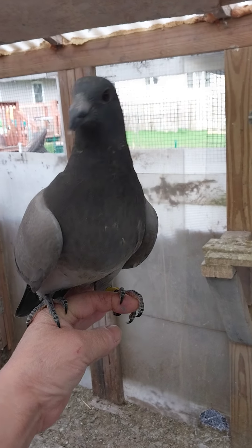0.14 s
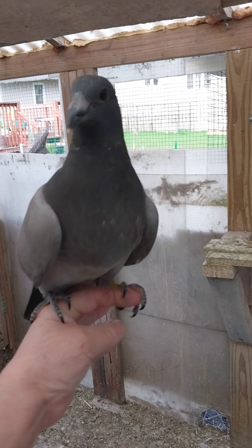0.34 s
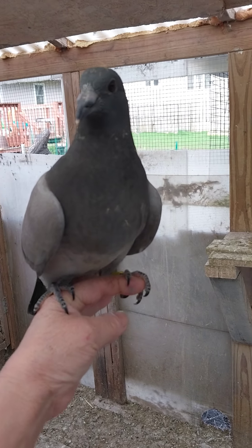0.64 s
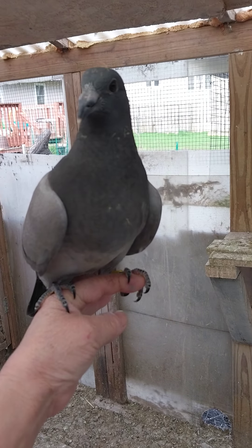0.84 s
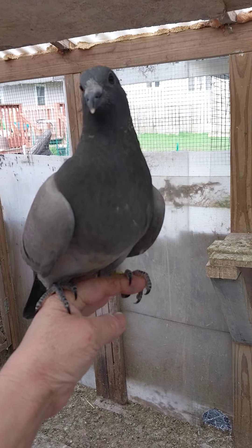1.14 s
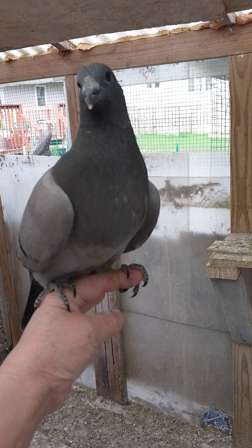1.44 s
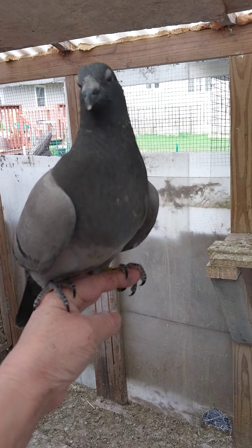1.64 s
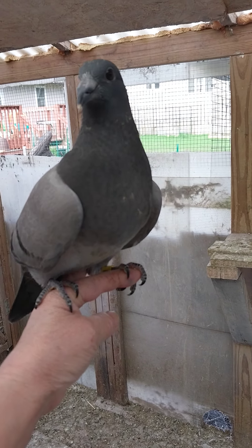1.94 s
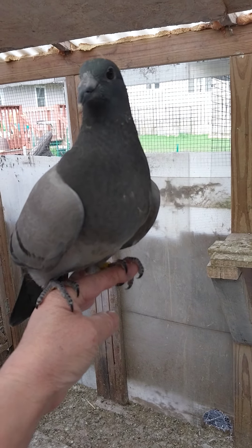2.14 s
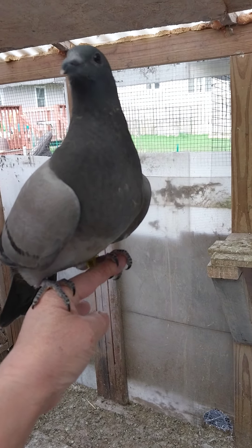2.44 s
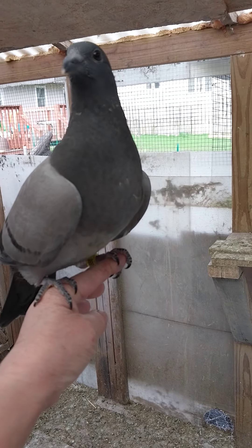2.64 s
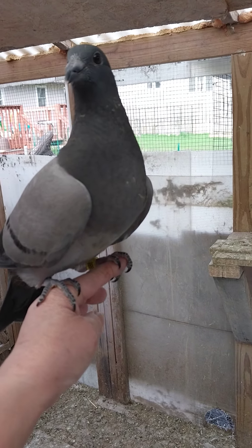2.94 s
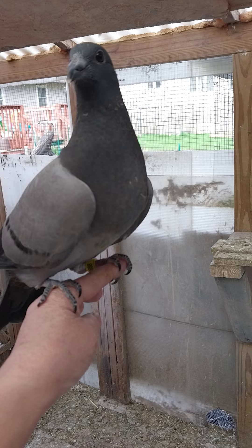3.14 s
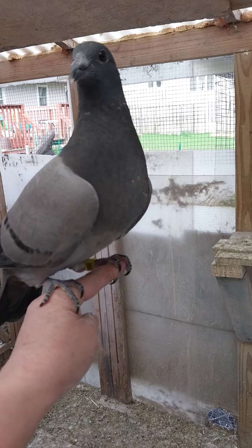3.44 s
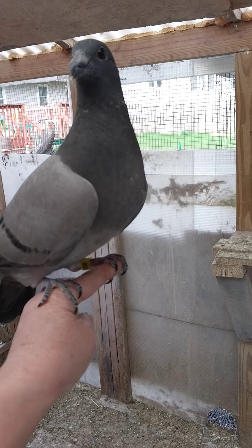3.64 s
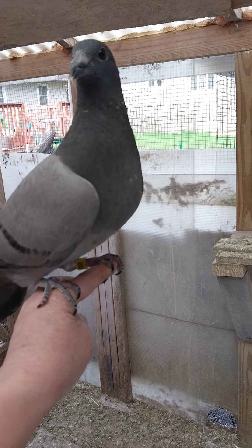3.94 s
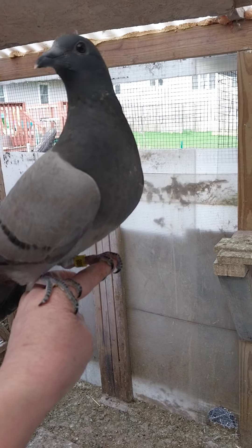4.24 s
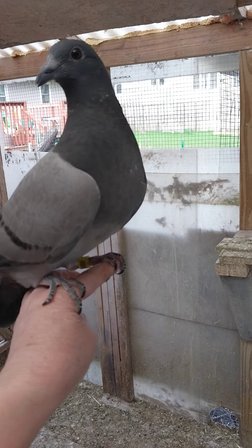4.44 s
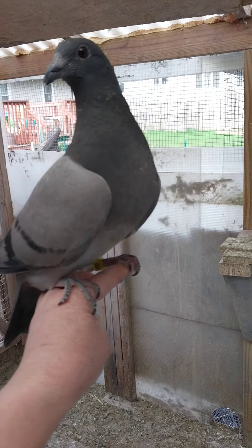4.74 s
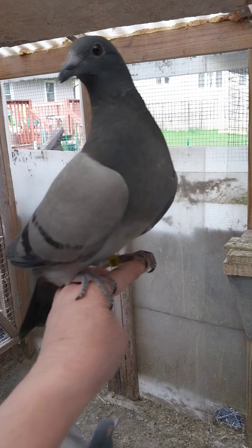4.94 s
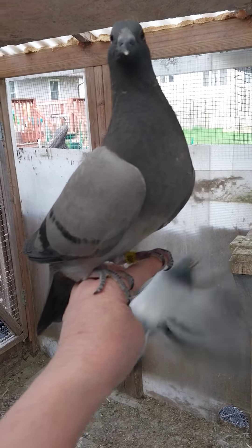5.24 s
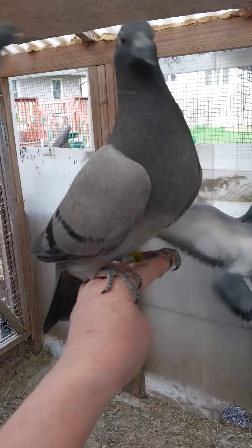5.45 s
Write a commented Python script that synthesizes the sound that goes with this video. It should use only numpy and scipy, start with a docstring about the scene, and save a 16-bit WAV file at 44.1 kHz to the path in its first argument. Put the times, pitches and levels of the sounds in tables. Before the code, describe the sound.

Throaty rolling pigeon coos with claw scratches and wooden knocks in a small loft, ending in a loud fluttering rush of wings.

```python
"""Pigeons in a small wooden loft

A pigeon perched on a hand gives three rolling coos and, later, one smooth falling one, with short hoots between.
The coos, hoots and thin whines are built from sine waves; feathers and claws are shaped noise.
Other birds knock on boards and a perch, which ring as sets of fading tones.
At the end a second pigeon flies up past the microphone: noise for its wings, low puffs for the moving air."""
import sys
import numpy as np
from scipy import signal
from scipy.fft import rfft, irfft, next_fast_len
from scipy.io import wavfile

SR = 44100
rng = np.random.default_rng(int(sys.argv[2]) if len(sys.argv) > 2 else 0)


def int16_out(signal):
    """Quantize to a 16-bit WAV file."""
    q = np.round(np.clip(np.atleast_2d(signal).T, -1, 1) * 32767)
    wavfile.write(sys.argv[1], SR, q.astype(np.int16))


N = 246298
T = np.arange(N) / SR  # time in seconds

# The swollen crop and closed beak let mostly low sound out.
# Each row: frequency in Hz, relative level in dB.
THROAT = [(60, -45), (150, -6), (300, 2.5), (420, 0.5), (495, -1), (590, -6), (690, -18.5), (900, -23.5),
          (1500, -47), (4000, -98.5)]
# Tone of claw scratches and wing slaps. Each row: frequency in Hz, relative level in dB.
SCRATCH_TONE = [(530, -43.5), (900, -0.5), (1480, -8.5), (1690, -9), (2510, -9), (4710, -2.5), (7410, -5),
                (8860, -11), (12700, -8), (15500, -33)]
PORT_LIKENESS = .75  # share of low air noise that both sides of the microphone have in common


def undb(db):
    """Decibels to gain."""
    return 10 ** (np.asarray(db) / 20)


def unit(x):
    """Scale to rms 1."""
    return x / np.sqrt(np.mean(x ** 2))


def walk(rate):
    """Smooth random wandering with spread 1 that changes about rate times a second."""
    size = next_fast_len(N)
    hz = np.fft.rfftfreq(size, 1 / SR)
    spectrum = rfft(rng.standard_normal(size)) / (1 + (hz / rate) ** 4)
    return unit(irfft(spectrum, size)[:N])


def colour(x, points):
    """Give a sound a spectrum of (Hz, dB) points, at rms 1."""
    hz, db = np.transpose(points)
    size = next_fast_len(N)
    log_hz = np.log(np.fft.rfftfreq(size, 1 / SR) + 1)
    gain = undb(np.interp(log_hz, np.log(hz), db))
    return unit(irfft(rfft(x, size) * gain, size)[..., :N])


def noise(likeness):
    """Two channels of noise that share a part."""
    share = np.clip(likeness, 0, 1)
    common = np.sqrt(share) * rng.standard_normal(N)
    return common + np.sqrt(1 - share) * rng.standard_normal((2, N))


def grains(spread_db, size=40):
    """Uneven strength of short grains, each size samples long."""
    grain_db = spread_db * np.repeat(rng.standard_normal(N // size + 1), size)[:N]
    return unit(undb(grain_db))


def pan(x, right_db):
    """Place a sound by its right minus left level."""
    return x * undb(np.array([[-right_db], [right_db]]) / 2)


def ramp(elapsed_s, length_s):
    """Rises evenly from 0 to 1 over a length of time, then stays."""
    return np.clip(elapsed_s / length_s, 0, 1)


def gate(age, length_s, attack_s, release_s):
    """Attack, hold and a release that tails off."""
    return ramp(age, attack_s) * ramp(length_s - age, release_s) ** 2


def cycle(hz):
    """Phase of an oscillator."""
    return 2 * np.pi * np.cumsum(hz) / SR


def strokes(rows, rise_s):
    """Loudness curve of (s, dB, t60) strokes that rise quickly and die away, cut after half a second."""
    power = np.zeros(N)
    for s, db, t60 in rows:
        start = int(s * SR)
        age = T[:min(N - start, SR // 2)]
        stroke = undb(db - 60 * age / t60) * (1 - np.exp(-age / rise_s))
        power[start:start + len(age)] += stroke ** 2
    return np.sqrt(power)


def narrow_strokes(rows, width_oct, rise_s):
    """Bursts of (s, dB, t60, Hz) noise, each in one narrow band."""
    out = 0
    for s, db, t60, hz in rows:
        band = [(hz * 2 ** (k * width_oct), -4 * k * k) for k in range(-4, 5)]
        out = out + colour(noise(0.14), band) * strokes([(s, db, t60)], rise_s=rise_s)
    return out


def ring(modes):
    """How an object rings when struck: fading (Hz, dB, t60) tones added up, peak 1."""
    t = T[:SR // 3]
    y = sum(undb(db - 60 * t / t60) * np.sin(2 * np.pi * hz * t) for hz, db, t60 in modes)
    return y / np.abs(y).max()


def churn(x, depth_db, rate):
    """Eddies make each half octave of the lows and mids swell and dip on its own."""
    out = 0
    for hz in 220 * 2 ** (np.arange(8) / 2):
        band = signal.sosfiltfilt(signal.butter(4, hz, fs=SR, output="sos"), x)
        out = out + band * undb(depth_db * walk(rate))
        x = x - band
    return unit(out + x)


def loft(x, wet_db, t60=0.37):
    """Close wooden walls add a short tail, thin in the bass and different on each side."""
    t = T[:SR // 3]
    tail = rng.standard_normal((2, len(t))) * undb(-60 * t / t60) * (t > .003)
    tail /= np.sqrt(np.sum(tail ** 2, axis=1, keepdims=True))
    tail = signal.sosfilt(signal.butter(3, 450, "high", fs=SR, output="sos"), tail)
    return x + undb(wet_db) * signal.fftconvolve(np.atleast_2d(x), tail, axes=1)[:, :N]


def wall_echo(x, lag_s=.0236, echo_db=-11):
    """The far wall returns the low voice once, a moment later."""
    return x + undb(echo_db) * np.interp(T - lag_s, T, x, left=0)


def rolling_coos(sum_db=-6, double_db=0, triple_db=-5, top_db=-15, high_db=-27, beat_db=-24,
                 over_gain_db=-4.5, rasp_db=-17, jitter=0.037, upper_jitter=0.0853, upper_lock=0.18,
                 wobble=0.01695, wobble_db=2.0, slip=1.36):
    """Two voices of the syrinx (voice organ) beat together; the roll is slower where their pitches are closer."""
    # Each row: start in seconds, length in seconds.
    coo_spans = [(0.0, 0.605), (.878, 0.69), (1.813, .67)]
    # Pressure surges. Each row: time in seconds, boost of the upper voice in dB,
    # boost of the overtones in dB, half length in seconds (short ones are lengthened below).
    surges = [(0.544, 6.5, 11, 0.0061), (1.233, 5.5, -2, 0.0064), (1.272, 3, 2, 0.0081),
              (1.37, 10.5, -1, 0.0096), (1.404, 8, -13, 0.006), (1.436, 10.5, -8, 0.0037),
              (1.453, 4.5, 9, 0.0079), (1.53, 3.5, -2, 0.0029), (2.14, 2.5, 1.5, 0.012),
              (2.224, 11, -4, 0.011), (2.323, 5.5, -0.5, 0.02), (2.383, 16.5, 0, 0.0071)]
    # Course of the coos. Each row: time in seconds, lower pitch in Hz, upper pitch in Hz,
    # then relative levels of the lower voice, upper voice and overtones in dB.
    roll = [(0, 176.2, 298, -40.5, -38.5, -44), (0.091, 179.3, 295, -40.5, -41.5, -40.5),
            (0.162, 193.6, 280, -35, -42, -44.5), (.22, 199, 280, -35.5, -40, -34),
            (0.298, 200.6, 280, -34.5, -34.5, -37), (0.389, 202.6, 284, -40, -31.5, -36),
            (0.482, 212.3, 288, -36.5, -33.5, -41.5), (0.551, 202, 280, -32.5, -30, -32.5),
            (0.621, 172, 300, -36, -36, -29), (0.877, 162, 295, -43, -35.5, -52),
            (0.951, 178, 295, -44, -39, -43.5), (1.029, 189.5, 290, -36, -40.5, -40.5),
            (1.148, 210, 305, -34.5, -37.5, -35), (1.249, 224.1, 298, -33, -33, -37),
            (1.349, 245, 292, -29, -37, -34), (1.449, 236, 305, -33, -36.5, -35.5),
            (1.52, 207.8, 290, -32, -36, -32.5), (1.58, 180.3, 300, -42, -29, -36),
            (1.812, 165.1, 300, -44, -37.5, -42.5), (1.9, 194.4, 300, -37.5, -37, -40.5),
            (1.96, 222, 305, -33, -33, -37.5), (2.052, 245.3, 308, -31.5, -35.5, -32.5),
            (2.16, 245.3, 303, -33.5, -31, -34), (2.261, 243.8, 302, -32.5, -35, -35.5),
            (2.339, 254, 290, -42, -27.5, -34.5), (2.41, 210.8, 298, -33, -42, -35),
            (2.48, 189.5, 285, -54, -28, -43)]
    shortest_surge_s = .006
    surge_duck = 1  # dB that the lower voice yields per dB of surge in the upper

    start, length = np.array(coo_spans)[np.searchsorted([coo[0] for coo in coo_spans[1:]], T)].T
    times, *course = np.transpose(roll)
    hz, upper_hz, low_db, up_db, over_db = (np.interp(T, times, column) for column in course)
    up_surge_db, over_surge_db = sum(
        np.outer(boosts, np.exp(-((T - s) / max(half, shortest_surge_s)) ** 4))
        for s, *boosts, half in surges)
    low_db = low_db - surge_duck * up_surge_db
    over_db = over_db + over_surge_db

    # a higher lower voice makes both membranes shake more
    unrest = np.clip((hz - 175) / 50, .3, 1.2)
    shake = 1 + jitter * unrest * walk(81.0)
    low = cycle(hz * shake * (1 + wobble * unrest * walk(28.4)))
    loose = (1 - upper_lock * unrest) / undb(up_surge_db)  # a surge steadies the upper voice
    up = cycle(upper_hz * shake * (1 + upper_jitter * loose * walk(69)))
    lower = undb(low_db + wobble_db * unrest * walk(30)) * np.sin(low)
    upper_tones = undb(up_surge_db) * np.sin(up) + undb(beat_db) * np.sin(up - low)
    upper = undb(up_db + 2 * loose * walk(50)) * upper_tones

    # both share one air stream, which mixes them into sum tones
    mixed = undb(double_db) * np.sin(2 * low)
    mixed += undb(sum_db) * np.sin(low + up + slip * walk(28))
    mixed += undb(top_db) * np.sin(2 * up)
    mixed += undb(high_db) * np.sin(2 * low + up)
    third = undb(triple_db) * (200 / hz) ** 4 * np.sin(3 * low)
    overtones = colour(mixed + third, THROAT) * undb(over_db + over_gain_db + 1.8 * walk(60))
    breath = colour(rng.standard_normal(N), THROAT)
    rasp = breath * undb(up_db + rasp_db) * (1 + 2 * np.cos(up - low))
    coo = (lower + upper + overtones + rasp) * undb(5.5)
    return coo * gate(T - start, length, attack_s=0.005, release_s=0.033)


def feathers(rustle_db=-2, scratch_db=-8, split_hz=6000):
    """A crackly rustle of sliding feathers swells at each shuffle, with sharper flicks and scratches."""
    # The bird shifts its weight and feathers slide over each other.
    # Each row: time in seconds, relative peak in dB, rise in seconds, fall in seconds.
    shuffles = [(.25, -57.5, 0.26, 0.15), (1.41, -58, 0.17, 0.2), (2.11, -42, 0.043, 0.21),
                (3.01, -60, 0.018, 0.032), (4.02, -70.5, 0.077, 1), (4.628, -41.5, 0.018, 0.025),
                (4.755, -38.5, 0.018, 0.017)]
    # Tone of the rustle. Each row: frequency in Hz, relative level in dB.
    rustle_tone = [(590, -9.5), (1000, -18.5), (1330, -18.5), (1680, -7.5), (2040, -13), (4810, -7.5),
                   (7360, -11), (8740, -15.5), (12600, -11), (15500, -20)]
    # Claw scratches and feather flicks. Each row: start in seconds, relative peak in dB,
    # time to fade by 60 dB in seconds, level of the top end against the body in dB.
    scratches = [(0.2544, -36.5, 0.15, -8), (0.406, -38.5, 0.11, -4), (1.17, -58, 0.25, 15),
                 (1.284, -43, 0.67, -1), (1.4167, -38.5, 0.089, -0.5), (1.4536, -47, 0.07, 4),
                 (1.575, -49.5, 0.14, 7.5), (1.635, -41.5, 0.19, 1), (1.8731, -46, 0.49, 7),
                 (1.9836, -48, 0.12, 11), (2.0293, -52, 0.13, 16), (2.0751, -42, 0.52, 11),
                 (2.2404, -29.5, 0.069, 3.5), (2.3206, -49, 0.08, 17.5), (2.612, -42, 0.075, 5),
                 (2.6812, -27.5, 0.2, -2), (2.7272, -35.5, 0.11, 3), (2.9414, -54, 0.12, 18.5),
                 (2.9976, -52, 0.17, 12), (3.1835, -37, 0.34, -9), (3.297, -42.5, 0.038, 6.5),
                 (3.3898, -38.5, 0.14, -4), (3.431, -40.5, 0.29, -2), (3.912, -43, 0.2, -11),
                 (3.9808, -39, 0.2, -1), (4.0566, -46, 0.12, -1), (4.1744, -50, 0.24, 7.5),
                 (4.318, -58.5, 0.15, 8), (4.5855, -41, 0.19, -7), (4.6186, -41, 0.087, 13)]
    rest_db = -70  # relative rustle level when the bird sits still
    flicks_per_s, flick_db, flick_spread_db, flick_t60_s = 4, -67, 3, .14  # faint ones at random times

    slide = undb(rest_db) + sum(undb(db) * np.exp(-np.maximum((s - T) / rise, (T - s) / fall))
                                for s, db, rise, fall in shuffles)
    crackle = colour(noise(0.098) * grains(spread_db=3.0, size=14), rustle_tone)
    rustle = crackle * slide * undb(rustle_db + 2.5 * walk(14.0))

    grit = colour(noise(.15) * grains(spread_db=3.5, size=24), SCRATCH_TONE)
    body = signal.sosfiltfilt(signal.butter(2, split_hz, fs=SR, output="sos"), grit)
    top_end = grit - body
    chance = rng.random((int(flicks_per_s * N / SR), 2))
    flicks = [(when * T[-1], flick_db + flick_spread_db * (2 * size - 1), flick_t60_s, 0)
              for when, size in chance]
    rows = scratches + flicks
    scratch = body * strokes([(s, db, t60) for s, db, t60, _ in rows], rise_s=0.00028)
    scratch += top_end * strokes([(s, db + top, t60) for s, db, t60, top in rows], rise_s=0.00036)
    return pan(rustle + undb(scratch_db) * scratch, right_db=2.0)


def yard(treble_drop_db=17):
    """Low outdoor rumble, made of noise that wavers in level."""
    # Tone before the treble drop. Each row: frequency in Hz, relative level in dB.
    yard_tone = [(13, -11), (22, -29.5), (59, 0.5), (92, 1), (117, -1), (146, -2.5), (438, -19), (530, -17),
                 (661, -13), (869, -15.5), (970, -18), (2150, -38.5), (4390, -51.5), (10600, -25),
                 (15500, -44)]
    # Course of the rumble. Each row: time in seconds, relative level in dB.
    yard_levels = [(0, -38.5), (.7, -46), (1.7, -48.5), (2.3, -46.5), (2.7, -47.5), (3.3, -47),
                   (4.3, -46.5), (5.58, -55)]
    # the drop grows from 500 Hz to its full size at 1000 Hz
    dark = [(hz, db - treble_drop_db * np.clip(np.log2(hz / 500), 0, 1)) for hz, db in yard_tone]
    level_db = np.interp(T, *np.transpose(yard_levels)) + 2 * walk(8.4)
    return pan(colour(noise(PORT_LIKENESS), dark) * undb(level_db), right_db=2.0)


def drags():
    """A claw dragging on the perch makes noise in one narrow band, far to the right."""
    # Each row: start in seconds, relative peak in dB, time to fade by 60 dB in seconds, pitch in Hz.
    drag_rows = [(.254, -63, 0.14, 2950), (0.409, -64, 0.56, 4450), (1.287, -54, 0.24, 3870),
                 (3.183, -61, 0.14, 4050)]
    return pan(narrow_strokes(drag_rows, width_oct=0.27, rise_s=0.0061), right_db=25.0)


def whines(edge_s=.035):
    """Thin sine notes that glide up or down; the last one runs into the smooth coo."""
    # Each row: start in seconds, length in seconds, relative level in dB, starting pitch in Hz,
    # fall in Hz per second (negative rises).
    whine_rows = [(0.522, 0.13, -44, 697, 98), (1.634, .1, -47, 618, -900),
                  (1.719, 0.086, -44, 696.3, -100), (3.005, 0.13, -63, 660, 100),
                  (3.852, 0.19, -42, 621, 298.5)]
    out = 0
    waver = 1 + 0.0079 * walk(34)
    flicker_db = 1.4 * walk(30)
    for s, length, db, hz, fall in whine_rows:
        age = np.clip(T - s, 0, length)
        note = np.sin(cycle((hz - fall * age) * waver))
        out = out + note * undb(db + flicker_db) * gate(age, length, edge_s, edge_s)
    return out


def hoots(gain_db=-1, octave_db=-12, fifth_db=-15, rasp_db=-14):
    """Short, throaty pushes of voice that sag in pitch; the throat dulls the higher ones most."""
    # Hoots and clucks. Each row: start in seconds, relative peak in dB, pitch in Hz before
    # the sag and waver, length in seconds.
    hoot_rows = [(0.586, -22.5, 350, 0.045), (0.642, -29, 292, 0.059), (0.681, -38.5, 290.3, 0.26),
                 (0.724, -38.5, 243, 0.12), (0.772, -32, 295, 0.067), (0.806, -36, 237.6, 0.18),
                 (1.584, -31, 233.3, 0.073), (1.626, -28.5, 313, 0.072), (1.698, -34, 376, 0.13),
                 (1.683, -21.5, 393.6, 0.038), (1.737, -19, 359.6, 0.031), (1.788, -31, 314, 0.034),
                 (2.837, -38, 297.5, 0.068), (3.136, -40, 145, 0.084), (3.449, -35.5, 255.5, 0.065),
                 (3.496, -33, 317, 0.057), (3.654, -36, 241, 0.1), (3.705, -26.5, 222.7, 0.063),
                 (3.812, -13, 334, 0.031), (3.919, -38, 372, 0.064), (4.317, -35, 224.3, 0.065),
                 (4.353, -35, 288.5, 0.046)]
    out = np.zeros(N)
    waver = 1 + .05 * walk(70)
    rasp = undb(rasp_db) * colour(rng.standard_normal(N), THROAT)
    for s, db, hz, length in hoot_rows:
        u = np.linspace(0, 1, int(length * SR))  # progress through the hoot
        span = slice(int(s * SR), int(s * SR) + len(u))
        phase = cycle(hz * (1 - .06 * (u - .3)) * waver[span])
        throat_db = np.interp(2 * hz, *np.transpose(THROAT)) / 2
        overtones = undb(octave_db) * np.sin(2 * phase) + undb(fifth_db) * np.sin(phase + phase / 2)
        voice = np.sin(phase) + undb(throat_db) * overtones + rasp[span]
        out[span] += undb(db + gain_db) * np.sin(np.pi * u ** 0.43) ** 2 * voice
    return out


def knocks(ring_db=2, thump_db=0, crack_db=-2, crack_t60=0.16, scuff=.08, tail_s=.17):
    """Each blow scuffs and rings the boards and perch and thumps the frame; softer materials sound duller."""
    # Each row: time in seconds, then relative levels in dB of board ring, perch ring, thump and crack,
    # then contact time in seconds, hardness as the treble limit in Hz.
    knock_rows = [(2.728, -43, -62, -32.5, -31.5, 0.0031, 6300),
                  (2.748, -31, -40, -22, -37.5, 0.0077, 5030), (3.2962, -26, -41, -24, -25, 0.002, 5500),
                  (3.2998, -15, -57, -27, -39, 0.0069, 6000), (3.308, -20.5, -51, -24.5, -37, 0.019, 4500),
                  (3.3167, -29, -44.5, -39, -42, .014, 4190), (3.429, -55, -38.5, -28, -35.5, 0.0028, 2200),
                  (3.802, -52, -30.5, -18.5, -27.5, 0.02, 4500),
                  (4.057, -56, -42.5, -27, -33.5, 0.0028, 4500),
                  (4.626, -39.5, -53, -43, -42.5, 0.011, 3000)]
    # Ringing tones of the boards, the perch and the frame under them.
    # Each row: frequency in Hz, relative level in dB, time to fade by 60 dB in seconds.
    board_modes = [(810, -16, .16), (852, -17, .12), (1168, -8, .1), (1237, -6, .1), (1308, -16, .12),
                   (1440, -19, .12), (1718, 2.5, .075), (1797, -12, .08), (1925, -17, .1), (2165, -19, .06),
                   (2309, -1, .055), (2353, -10, .06), (2600, -18, .06), (2925, -12, .05), (2992, -4, .07),
                   (3062, -4, .07), (3305, -10, .07), (3420, -3, .07), (3570, -10, .07), (3800, -17, .06),
                   (6778, -11, .06), (6880, -14, .05)]
    perch_modes = [(812, 0, .15), (900, -7, .08), (1180, -12, .1), (1443, -7, .09), (2164, -4, .06),
                   (2315, -4, .08), (2912, -7, .09), (3451, -2, .09), (3752, -2, .08), (4300, -10, .06)]
    frame_modes = [(221.6, -2.5, 0.32), (284, 7.5, 0.057), (365, -1.5, 0.095), (416, -13, 0.038),
                   (463, -6, 0.22), (872, -19, 0.29)]
    # Tone of the crack. Each row: frequency in Hz, relative level in dB.
    crack_tone = [(59, -55.5), (100, -22), (285, 6), (1020, -2.5), (1210, -5), (1560, -12), (1730, -10),
                  (2050, -12.5), (2270, -20), (3530, -10.5), (4700, -22.5), (15000, -36)]

    taps, thumps, t = np.zeros((2, 2, N)), np.zeros(N), T[:SR // 20]
    for s, board_db, perch_db, low_db, _, contact, hard_hz in knock_rows:
        start = int(s * SR)
        push = scuff * rng.standard_normal((2, len(t))) * np.exp(-t / contact)
        push[:, 0] += 1  # the blow itself
        push = signal.sosfilt(signal.butter(2, hard_hz, fs=SR, output="sos"), push)
        taps[..., start:start + len(t)] += undb([board_db, perch_db])[:, None, None] * push
        thumps[start] += undb(low_db)
    boards = sum(signal.fftconvolve(tap, ring(modes)[None], axes=1)[:, :N]
                 for tap, modes in zip(taps, (board_modes, perch_modes)))
    # the frame's thump sounds only between about 170 Hz and 1 kHz
    frame = signal.fftconvolve(thumps, ring(frame_modes))[:N]
    frame = signal.sosfilt(signal.butter(2, [170, 1000], "band", fs=SR, output="sos"), frame)
    crack_rows = [(s, db, crack_t60) for s, _, _, _, db, _, _ in knock_rows]
    crack = colour(noise(0.22), crack_tone) * strokes(crack_rows, rise_s=0.0055)
    hits = loft(undb(ring_db) * boards + undb(crack_db) * crack, wet_db=-10.0, t60=tail_s)
    return pan(hits + undb(thump_db) * frame, right_db=2.0)


def smooth_coo(half_db=-14, octave_db=-31, rasp_db=-24):
    """The voice drops onto a nearly pure note, fades and sinks; unlike alternate cycles add a faint fifth."""
    start_s, length_s = 4.015, 0.35
    note_hz, fall_hz_per_s = 304, 90
    drop_hz, drop_s, sag_hz, sag_s = 124, 0.0454, 71.3, 0.185
    start_db, fade_db_per_s = -24, 20
    age = T - start_s
    hz = note_hz - fall_hz_per_s * np.clip(age, 0, length_s)
    hz += drop_hz * (1 - ramp(age, drop_s))
    hz -= sag_hz * ramp(age - length_s + sag_s, sag_s) ** 2
    db = start_db - fade_db_per_s * np.maximum(age, 0)
    phase = cycle(hz * (1 + .01 * walk(40)))
    fifth = np.sin(phase + phase / 2) * undb(half_db + 0.64 * (db - db.max()))
    octave = undb(octave_db) * np.sin(2 * phase)
    rasp = undb(rasp_db) * colour(rng.standard_normal(N), THROAT)
    note = np.sqrt(2) * (np.sin(phase) + fifth + octave + rasp) * undb(db + 0.82 * walk(96))
    return note * gate(age, length_s, attack_s=0.078, release_s=0.099)


def flight(rush_db=-3, flutter_db=-9, beat_db=-11, puff_db=-2, puff_cycles=0.57):
    """Wings rush, flutter and slap; their downwash rumbles on the microphone."""
    # Wing beats, between eight and nine a second. Each row: time in seconds, relative slap in dB,
    # time to fade by 60 dB in seconds, relative puff in dB, puff pitch in Hz, relative whoosh in dB.
    beats = [(4.752, -28.5, 0.51, -30.5, 132, -36), (4.863, -21, 0.19, -22.5, 103.5, -31.5),
             (4.979, -25, 0.16, -20, 122.6, -26), (5.1086, -16, 0.14, -17, 98, -41),
             (5.224, -20.5, 0.2, -17, 105, -29), (5.335, -23.5, 0.18, -15, 52.6, -35),
             (5.474, -42, 0.36, -25, 107, -33.5), (5.568, -33, 0.17, -20, 120, -26)]
    # Wings clap together or brush the walls between beats.
    # Each row: time in seconds, relative peak in dB, time to fade by 60 dB in seconds.
    claps = [(4.934, -26.5, 0.21), (5.0594, -41, 0.48), (5.296, -19.5, 0.088)]
    # Hollow bumps as the bird flaps by. Each row: time in seconds, relative peak in dB, pitch in Hz.
    bumps = [(4.852, -18.5, 322), (4.947, -23, 115), (5.028, -22, 126), (5.055, -27, 110),
             (5.18, -20.5, 130), (5.207, -16, 336), (5.302, -24, 270), (5.386, -19, 347),
             (5.53, -12.5, 293.7), (5.544, -21, 115.3), (5.56, -17.5, 166.3)]
    # Wing tips swish through the air. Each row: start in seconds, relative peak in dB,
    # time to fade by 60 dB in seconds, pitch in Hz.
    swish_rows = [(4.78, -35, 0.15, 1720), (4.832, -28.5, 0.14, 588), (4.915, -38.5, 0.33, 1040),
                  (5.11, -32.5, 0.47, 1580), (5.457, -25, 0.064, 1260)]
    # Tones of the wings, the downwash and the whoosh. Each row: frequency in Hz, relative level in dB.
    wing_tone = [(150, -45), (250, -16), (297, -1.5), (324, -18), (392, -23), (563, -14), (852, -14),
                 (1120, -17.5), (1590, -17), (2130, -19.5), (5220, -21), (7510, -24), (8470, -27.5),
                 (12400, -22.5), (15500, -32)]
    buffet_tone = [(12, -37), (20, -11), (54, 6), (113, 3.5), (160, -12), (198, 3.5), (323, -10.5),
                   (400, 0), (520, -26), (880, -120)]
    whoosh_tone = [(90, -7), (200, 1.5), (330, 3.5), (480, -3.5), (700, -8), (1050, -11.5), (1600, -24),
                   (4000, -36), (15000, -35)]
    # Resonances that colour the flutter. Each row: frequency in Hz, width in Hz, relative level in dB.
    hollow_rows = [(858, 57, 1), (1770, 370, 4.5)]
    take_off_s, take_off_rise_s, nearest_s = 4.7, 0.083, 5.02
    air_peak_db, approach_db_per_s, leave_db_per_s = -28, 48, 4
    wash_peak_db, wash_approach_db_per_s = -31, 56
    puff_lag_s, whoosh_lag_s, whoosh_half_s = 0.021, 0.017, 0.025

    before, after = np.maximum(nearest_s - T, 0), np.maximum(T - nearest_s, 0)
    air_db = air_peak_db - approach_db_per_s * before - leave_db_per_s * after
    rush = churn(colour(noise(.1) * grains(spread_db=2.5), wing_tone), depth_db=4.5, rate=22)
    rush *= undb(air_db + rush_db + 1.2 * walk(35))

    # flight feathers flick in uneven bursts that ring the hollows of the loft
    hollows = ring([(hz, db, np.log(1000) / (np.pi * width_hz)) for hz, width_hz, db in hollow_rows])
    bursts = noise(.2) * grains(spread_db=4, size=500)
    flutter = unit(signal.fftconvolve(bursts, hollows[None], axes=1)[:, :N])
    flutter *= undb(air_db + flutter_db)

    blows = [beat[:3] for beat in beats] + claps
    slaps = colour(noise(0.046) * grains(spread_db=3.5), SCRATCH_TONE)
    slaps = slaps * strokes(blows, rise_s=0.0014) * undb(beat_db)
    slaps += colour(noise(.3) * grains(spread_db=4), wing_tone) * strokes(blows, rise_s=.004) * undb(-6)

    # each downstroke also shoves a broad whoosh of air
    downstrokes = sum(undb(db) * np.exp(-((T - s - whoosh_lag_s) / whoosh_half_s) ** 2)
                      for s, *_, db in beats)
    whoosh = colour(noise(0.59), whoosh_tone) * downstrokes
    swishes = narrow_strokes(swish_rows, width_oct=0.12, rise_s=0.0032)
    wash_db = wash_peak_db - wash_approach_db_per_s * before + 2.4 * walk(17)
    wash = colour(noise(PORT_LIKENESS), buffet_tone) * undb(wash_db)

    puffs = 0
    for s, db, hz in [(s + puff_lag_s, db, hz) for s, _, _, db, hz, _ in beats] + bumps:
        swell = undb(db + puff_db) * np.exp(-((T - s) * hz / puff_cycles) ** 2)
        puffs = puffs + swell * np.sin(2 * np.pi * (hz * T + rng.random()))
    air = (rush + flutter + wash) * ramp(T - take_off_s, take_off_rise_s)
    return pan(air + puffs + whoosh + slaps + swishes, right_db=1.5)


def scene():
    """The cooing bird, close by and nearer the right side, among the noises of the loft."""
    bird = wall_echo(rolling_coos() + hoots()) + smooth_coo() + whines()
    # the left side hears it a little later
    sides = np.array([np.interp(T - .00025, T, bird), bird])
    voice = loft(sides, wet_db=-5)
    return pan(voice, right_db=4.0) + knocks() + drags() + feathers() + flight() + yard()


def record(dry, shade_hz=6500, shade=0.56, top_hz=15750):
    """The left side of the microphone is duller than the right; the phone cuts the top of both."""
    treble = signal.sosfiltfilt(signal.butter(3, shade_hz, "high", fs=SR, output="sos"), dry[0])
    sides = np.array([dry[0] - shade * treble, dry[1]])
    return signal.sosfilt(signal.ellip(10, .2, 80, top_hz, fs=SR, output="sos"), sides)


dry = scene()
out = record(dry)
int16_out(out)
```